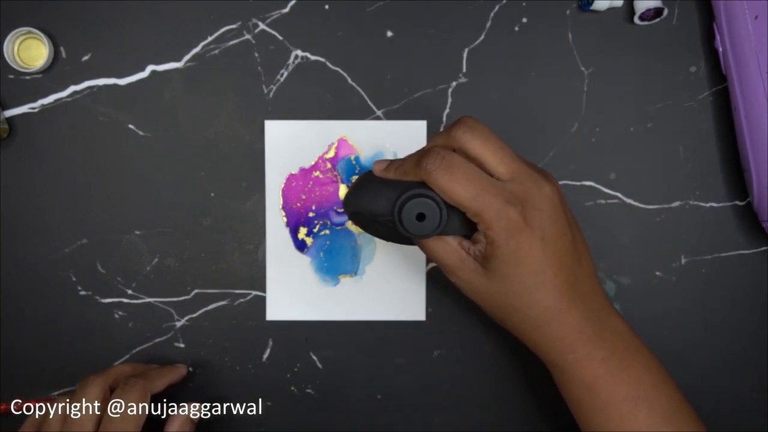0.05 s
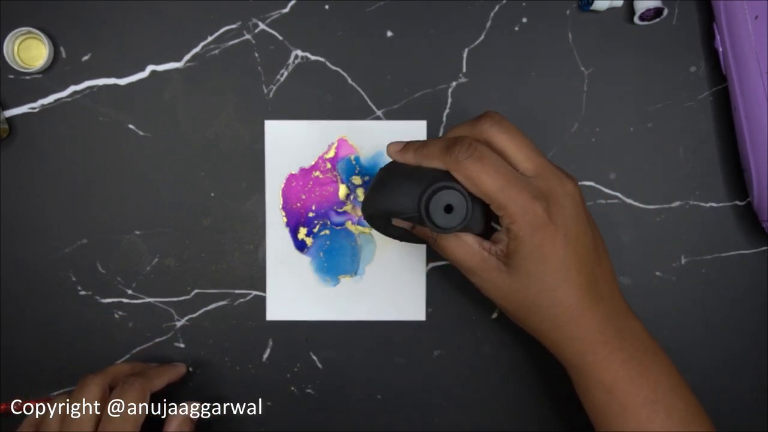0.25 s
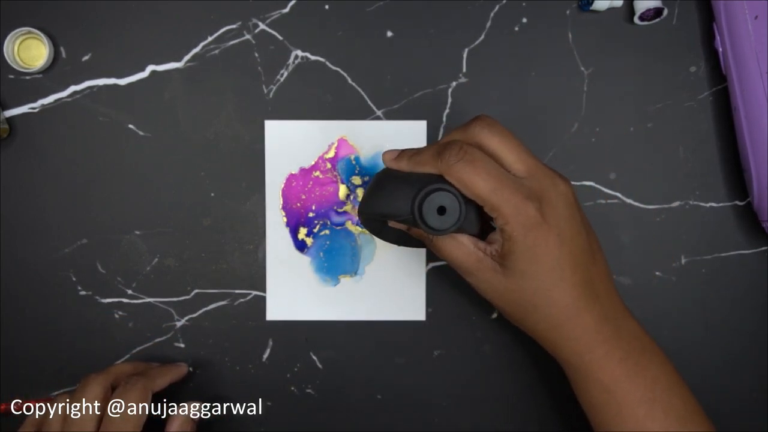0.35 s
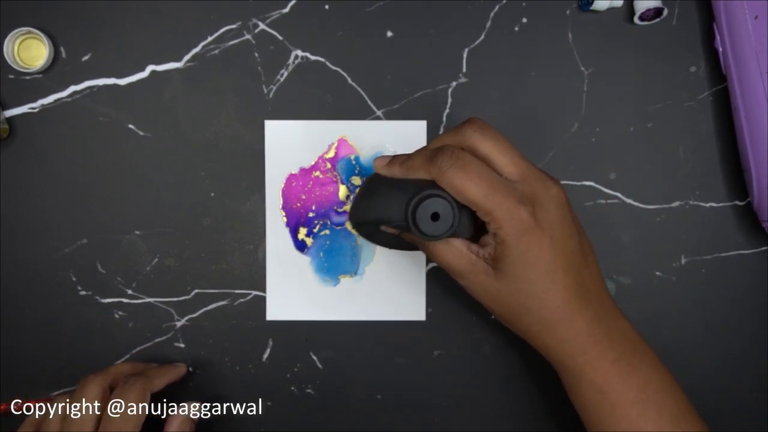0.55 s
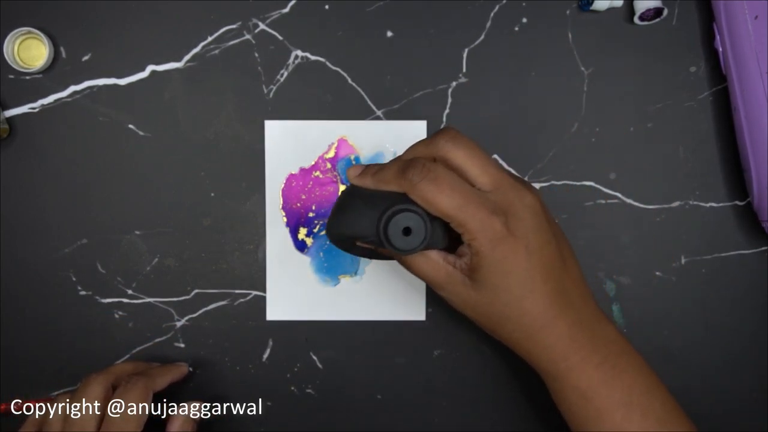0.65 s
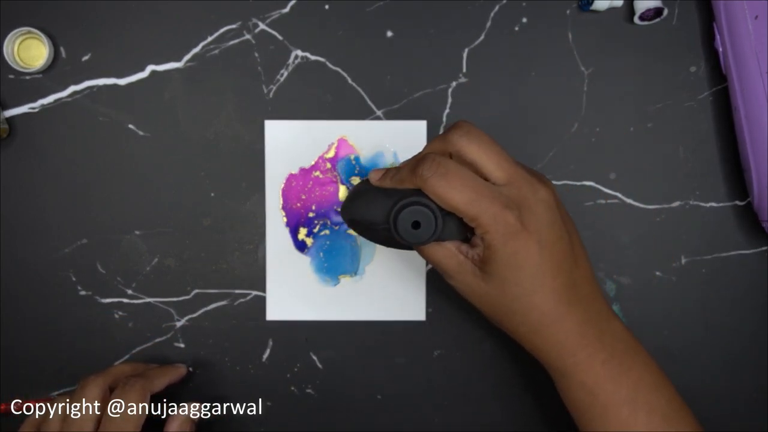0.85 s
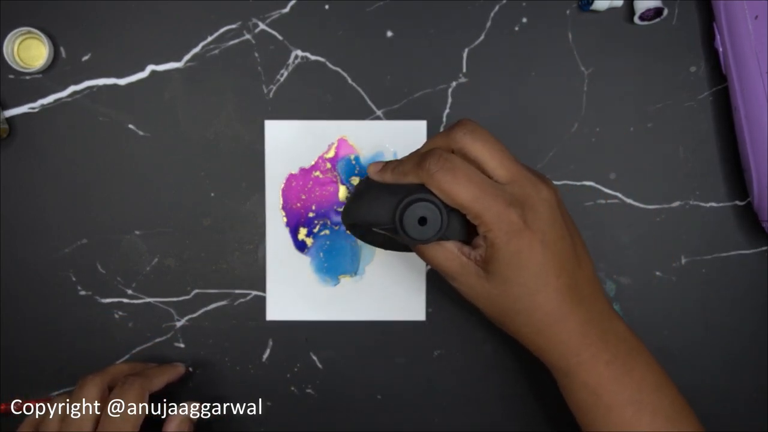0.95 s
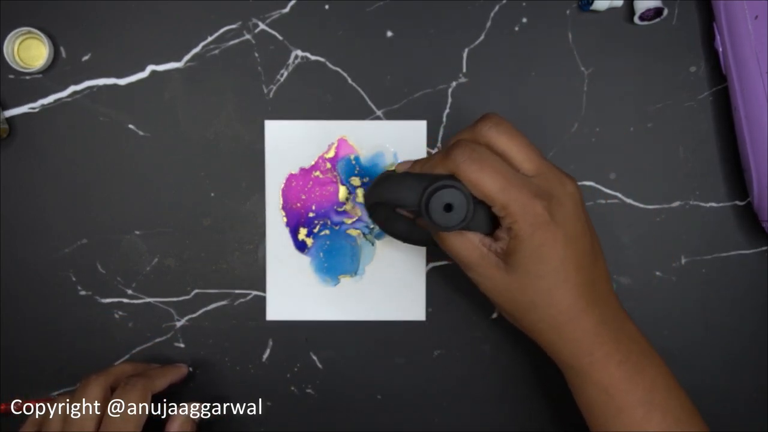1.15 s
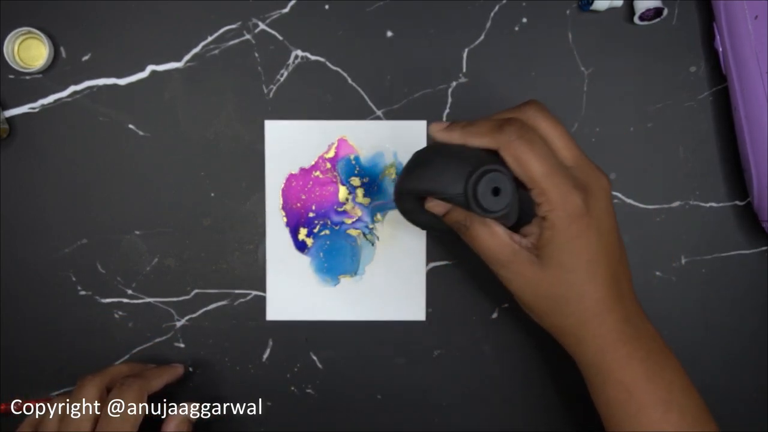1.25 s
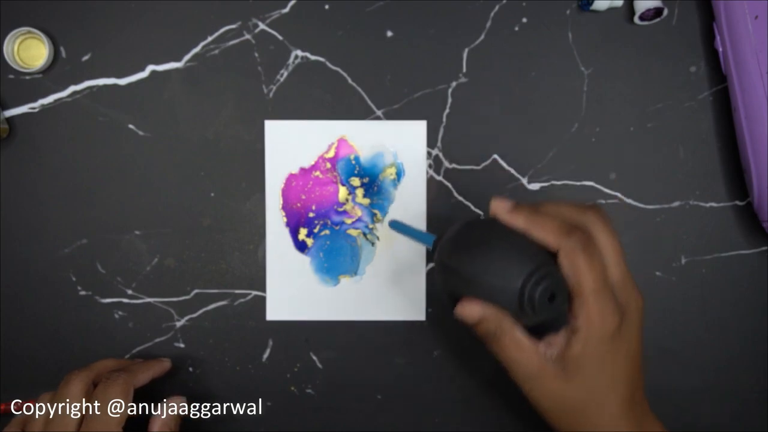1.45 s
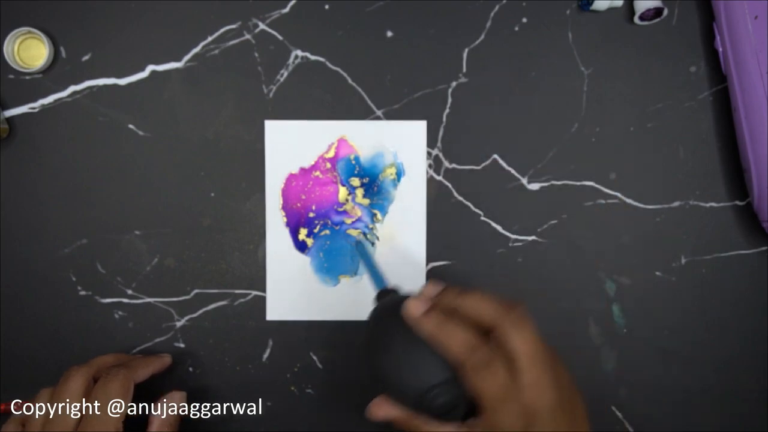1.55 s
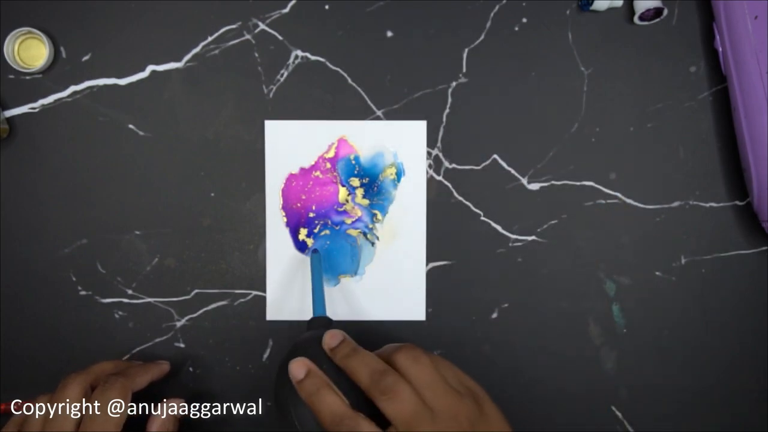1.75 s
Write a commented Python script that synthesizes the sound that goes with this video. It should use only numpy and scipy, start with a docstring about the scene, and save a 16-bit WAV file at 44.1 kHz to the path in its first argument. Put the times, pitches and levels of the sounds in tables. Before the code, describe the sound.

A rubber bulb blower gives four short, squeaky, whistling puffs of air in a quiet room.

```python
"""Rubber bulb blower

A hand squeezes the bulb four times over a table in a quiet room. Each puff whistles in the nozzle,
the pitch arching with the air flow over a hiss. The last, hardest puff breaks up into rushing air,
whistles again and trails off. The bulb sucks air back in between puffs. A duller copy running
slightly ahead makes everything sound doubled and a little hollow."""
import sys
import numpy as np
from scipy import signal
from scipy.fft import rfft, irfft, next_fast_len
from scipy.io import wavfile
from scipy.ndimage import map_coordinates

SR = 44100
rng = np.random.default_rng(int(sys.argv[2]) if len(sys.argv) > 2 else 0)


def master(y):
    """Save y as 16-bit WAV."""
    cut = np.clip(np.atleast_2d(y).T, -1, 1)
    pcm = np.round(cut * 32767)  # scale
    wavfile.write(sys.argv[1], SR, pcm.astype(np.int16))


N = 79380


def amp(db):
    """Decibels to gain."""
    return 10 ** (np.asarray(db) / 20)


def unit(x):
    """Scale to rms 1."""
    return x / np.sqrt(np.mean(x ** 2) + 1e-20)


def clock():
    """Sample times in s."""
    return np.arange(N) / SR


def along(points, hz):
    """Interpolate (freq_hz, value) points on a log frequency axis."""
    freq_hz, values = np.transpose(points)
    return np.interp(np.log(hz + 1), np.log(freq_hz + 1), values)


def wobble(rate_hz):
    """Smooth random curve, rate_hz knots a second."""
    return map_coordinates(rng.standard_normal(int(N * rate_hz / SR) + 4), [clock() * rate_hz])


def filtered(x, response):
    """Apply a frequency response."""
    size = next_fast_len(N + SR // 2)
    return irfft(rfft(x, size) * response(np.fft.rfftfreq(size, 1 / SR)), size)[:N]


def noise(spectrum):
    """Coloured noise, rms 1."""
    return unit(filtered(rng.standard_normal(N), lambda hz: amp(along(spectrum, hz))))


def tone(hz):
    """Sine along a pitch curve, rms 1."""
    return np.sqrt(2) * np.sin(2 * np.pi * (np.cumsum(hz) / SR + rng.random()))


def gate(start_s, length_s, rise_s, fall_s):
    """Smooth attack, hold and release."""
    t = clock() - start_s
    attack = np.sin(np.pi / 2 * np.clip(t / rise_s, 0, 1))
    release = np.sin(np.pi / 2 * np.clip((length_s - t) / fall_s, 0, 1))
    return (attack * release) ** 1.8


def swell(peak_s, rise_s, fall_s):
    """Bell envelope, at half height rise_s before and fall_s after its peak."""
    t = clock() - peak_s
    return np.exp(-.7 * np.abs(t / np.where(t < 0, rise_s, fall_s)) ** 1.7)


def hiss(swells, spectrum):
    """Swells of coloured noise."""
    return noise(spectrum) * sum(amp(db) * swell(*timing_s) for *timing_s, db in swells)


def background():
    """Room noise, a wavering hum and a thin electrical whine."""
    # room noise spectrum: freq_hz, gain_db
    floor_spectrum = [(25, -7.5), (45, -1.5), (85, -11.5), (130, -7.5), (165, -5.5), (200, -11), (238, -3),
                      (280, -7), (340, -3), (470, -8.5), (800, -11), (1400, -12), (2000, -21), (4000, -31),
                      (7000, -37.5), (10000, -39), (13000, -41), (15500, -36)]
    hum_hz, whine_hz = 165.5, 8027
    hum = amp(-74.5 + 4.5 * wobble(12)) * tone(hum_hz + 4 * wobble(11))
    return amp(-61) * noise(floor_spectrum) + hum + amp(-75) * tone(np.full(N, whine_hz))


def ringing():
    """The room still rings from an earlier puff."""
    # ring spectrum: freq_hz, gain_db
    spectrum = [(7500, -39), (8650, 6.5), (9500, -13.5), (10400, -8), (11200, -40)]
    t60_s = .4
    return noise(spectrum) * amp(-68 - 60 * clock() / t60_s)


def room(x):
    """Near reflections from the table top, then a short diffuse tail."""
    # reverberation time: freq_hz, t60_s
    decay = [(300, .4), (2500, 0.8), (4300, 0.35), (6000, 0.5), (9000, 0.34), (12000, 0.26), (15000, .3)]
    early_db, tail_db, early_t20_s = -7, -13.5, .022
    hz, frame_s, bins = signal.stft(rng.standard_normal(SR // 2), SR, nperseg=256)
    tail = signal.istft(bins * amp(-60 * frame_s / along(decay, hz)[:, None]), SR, nperseg=256)[1]
    t = np.arange(len(tail)) / SR
    early = rng.standard_normal(len(t)) * amp(-20 * t / early_t20_s) * (t > .001)
    response = amp(tail_db) * tail / np.linalg.norm(tail) + amp(early_db) * early / np.linalg.norm(early)
    return signal.fftconvolve(x, response)[:N]


def seep():
    """Faint high hiss as the fingers ease."""
    # seeping air: peak_s, rise_s, fall_s, level_db
    swells = [(.835, 0.018, 0.023, -70.5)]
    # seep spectrum: freq_hz, gain_db
    spectrum = [(9000, -22), (12200, -13), (13300, -18), (14400, 0), (15300, -14)]
    return hiss(swells, spectrum)


def intake():
    """The bulb draws air back in; its inlet valve peeps."""
    # indrawn air: peak_s, rise_s, fall_s, level_db
    swells = [(.1, 0.035, 0.029, -57), (.418, 0.013, 0.042, -50), (1.066, 0.009, 0.044, -51)]
    # inlet spectrum: freq_hz, gain_db
    spectrum = [(1500, -31), (3000, -21.5), (5500, -14), (7200, -18), (9200, -2), (10500, -15), (11400, 0),
                (12300, -2), (13000, -21.5), (13700, -11.5), (15500, -12)]
    # valve peeps: start_s, length_s, first_hz, last_hz, level_db
    peeps = [(1.051, 0.0098, 11850, 12270, -44.5), (1.057, .005, 12460, 12900, -45)]
    return hiss(swells, spectrum) + chirps(peeps)


def paper_rush():
    """Air from the hardest squeeze rushes over paper."""
    # rushing air: peak_s, rise_s, fall_s, level_db
    swells = [(1.27, 0.028, 0.042, -50)]
    # rush spectrum: freq_hz, gain_db
    spectrum = [(700, -35), (1400, -9.5), (1900, -9.5), (2230, 1.5), (2500, -5.5), (2850, -1), (3500, -1.5),
                (4200, -12.5), (9000, -22.5)]
    return hiss(swells, spectrum)


def nozzle_jet():
    """The jet hisses and flutters, with fizz above 11 kHz, most on the hardest squeeze."""
    # air leaving the nozzle: peak_s, rise_s, fall_s, jet_db, fizz_db
    puffs = [(.255, 0.028, 0.054, -44, -66), (.588, .02, .024, -54, -78), (.986, 0.013, 0.01, -54.5, -58),
             (1.266, 0.029, 0.049, -35.5, -45.5)]
    # jet spectrum: freq_hz, gain_db
    jet_spectrum = [(500, -50.5), (1200, -32.5), (2250, -22.5), (2900, -24), (4000, -27), (4600, -8),
                    (5800, -25), (6600, -12), (7600, -12.5), (8700, -2), (9300, -4), (10400, 0),
                    (11500, -4.5), (12800, -11), (15500, -29.5)]
    # fizz spectrum: freq_hz, gain_db
    fizz_spectrum = [(9000, -40.5), (11300, -5.5), (12400, -6), (12950, -5.5), (13300, 13), (13650, -18.5),
                     (14100, -1.5), (14600, -14), (15700, -15)]
    jet = unit(noise(jet_spectrum) * amp(1.1 * wobble(250)))
    fizz = unit(noise(fizz_spectrum) * amp(-1.5 * wobble(180)))
    return sum(swell(*timing_s) * (amp(jet_db) * jet + amp(fizz_db) * fizz)
               for *timing_s, jet_db, fizz_db in puffs)


def nozzle_pipe():
    """The nozzle's low pipe note swells at moderate flow and sags in pitch."""
    # pipe notes: peak_s, rise_s, fall_s, pitch_hz, level_db
    notes = [(0.283, 0.023, 0.0073, 4285, -41.5), (0.594, .016, 0.007, 4240, -54.5),
             (0.994, .015, .005, 4263, -57.5), (1.227, 0.0032, 0.00593, 4500, -36.5),
             (1.32, 0.009, 0.018, 4308, -31)]
    sag_hz_per_s, waver_hz = 2100, 24.5
    out = np.zeros(N)
    for peak_s, rise_s, fall_s, hz, db in notes:
        sag_hz = sag_hz_per_s * np.clip(clock() - peak_s, -.05, .02)
        out += amp(db) * swell(peak_s, rise_s, fall_s) * tone(hz - sag_hz + waver_hz * wobble(300))
    return out


def whistle(hz, db):
    """Air whistle shaken by turbulence; a second oscillation puts a faint line on either side."""
    break_hz, starved_db, waver_hz = 10950, -38.5, 22
    side_offset_hz, breath_width_hz = 3885, 400
    # the pitch frays when too high or starved of air
    smear_hz = .14 * np.maximum(hz - break_hz, 0) + 4.5 * np.maximum(starved_db - db, 0)
    hz = hz + waver_hz * wobble(400) + smear_hz * wobble(1000)
    sides = amp(-23.5) * tone(hz - side_offset_hz) + amp(-31.5) * tone(hz + side_offset_hz)
    side_gain = amp(.32 * (db + 26.5))  # side lines grow faster than the whistle
    breath_hz = 2480 + .45 * (hz - 9450)  # a turbulence band follows the pitch
    breath = amp(-33) * tone(breath_hz + breath_width_hz / 2 * wobble(1000)) * wobble(breath_width_hz)
    voice = tone(hz) + side_gain * sides * (1 + .29 * wobble(500)) + breath
    flutter_db = -.43 * wobble(150)
    roughness = 1 + .059 * wobble(1500)
    return voice * amp(db + flutter_db) * roughness


def chirps(rows):
    """Short whistles that glide and settle on their last pitch."""
    out = np.zeros(N)
    for start_s, length_s, first_hz, last_hz, db in rows:
        remaining = 1 - np.clip((clock() - start_s) / length_s, 0, 1)
        hz = last_hz + (first_hz - last_hz) * remaining ** 1.6
        out += whistle(hz, db) * gate(start_s, length_s, .27 * length_s, .67 * length_s)
    return out


def nozzle_whistle():
    """The whistle arches with the squeeze; brief higher stages sound as the flow builds and ebbs."""
    # main whistle, one curve per unbroken stretch: time_s, pitch_hz, level_db
    curves = [
        [(.197, 8400, -54), (.201, 8860, -32.5), (.207, 9400, -30.5), (.216, 9650, -33.5), (.222, 10680, -27),
         (.243, 11010, -25), (.272, 10830, -23.5), (.277, 10420, -26), (.288, 9800, -27.5), (.303, 8650, -32.5),
         (.31, 8130, -50)],
        [(.557, 8400, -47.5), (.562, 8880, -32.5), (.573, 9510, -32.5), (.587, 9290, -34.5), (.6, 9360, -25.5),
         (.606, 8840, -32.5), (.616, 8440, -37)],
        [(.961, 8520, -50.5), (.965, 8850, -33), (.974, 9440, -31.5), (.986, 9720, -29.5), (.996, 9300, -32),
         (1.001, 8680, -30), (1.005, 7800, -57)],
        [(1.206, 8900, -59), (1.21, 9270, -34.5), (1.215, 9620, -35), (1.224, 11210, -29), (1.231, 12600, -38),
         (1.238, 13200, -41)],
        [(1.297, 11620, -37.5), (1.301, 11540, -25), (1.317, 10720, -24.5), (1.321, 10500, -26.5),
         (1.331, 10110, -29), (1.334, 9480, -25), (1.344, 9530, -26), (1.351, 9040, -37.5), (1.37, 8540, -34),
         (1.382, 8030, -50)],
        [(1.412, 9500, -46.5), (1.45, 8790, -54.5), (1.48, 9410, -43.5), (1.505, 8930, -52),
         (1.525, 9560, -45.5), (1.545, 9700, -54), (1.551, 9450, -42.5), (1.556, 8800, -63)],
    ]
    # higher stages: start_s, length_s, first_hz, last_hz, level_db
    stages = [ (.188, 0.0079, 9500, 12100, -57.5), (.204, .018, 11400, 13840, -52),
              (.549, 0.012, 9500, 12100, -48.5), (.572, 0.035, 10410, 10340, -42.5),
              (.616, 0.013, 10200, 10400, -46), (.948, 0.031, 9200, 11770, -55),
              (.972, 0.031, 10360, 10510, -35), (.975, 0.017, 11400, 12100, -47),
              (1.203, 0.02, 11000, 13270, -54), (1.381, .024, 11150, 10470, -35.5)]
    edge_s = .00099
    out, t = np.zeros(N), clock()
    for curve in curves:
        time_s, hz, db = np.transpose(curve)
        envelope = gate(time_s[0] - edge_s, time_s[-1] - time_s[0] + 2 * edge_s, edge_s, edge_s)
        out += whistle(np.interp(t, time_s, hz), np.interp(t, time_s, db)) * envelope
    return out + chirps(stages)


def scene():
    """The blower in its room."""
    blower = nozzle_whistle() + nozzle_pipe() + nozzle_jet() + paper_rush() + intake() + seep()
    return (blower + room(blower) + ringing() + background())[None]


def record(dry):
    """A second, duller pickup is mixed in slightly ahead; the sum is band-limited."""
    # second pickup response: freq_hz, gain_db
    lead_colour = [(100, -5.5), (900, -1), (1600, -7.5), (4300, -18.5), (9000, -16), (12000, -21.5)]
    lead_s, cutoff_hz = .01743, 15750

    def response(hz):
        lead = amp(along(lead_colour, hz)) * np.exp(2j * np.pi * hz * lead_s)
        return (1 + lead) * (hz < cutoff_hz)

    return filtered(dry[0], response)[None]


dry = scene()
out = record(dry)
master(out)
```